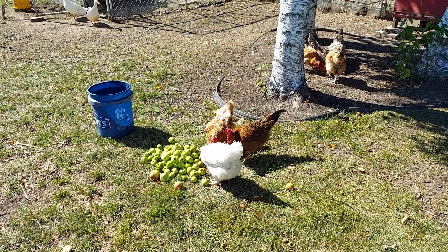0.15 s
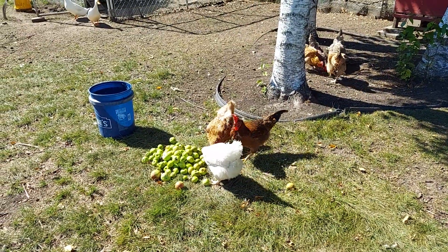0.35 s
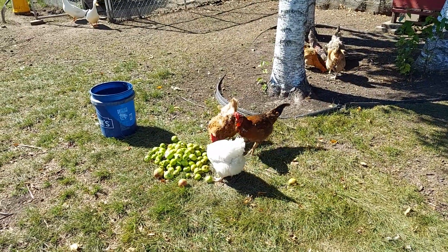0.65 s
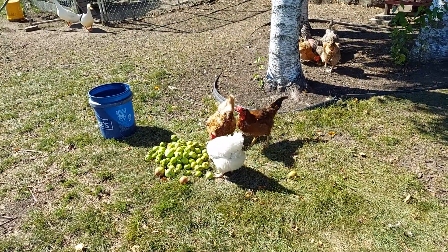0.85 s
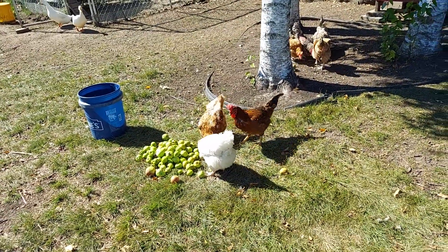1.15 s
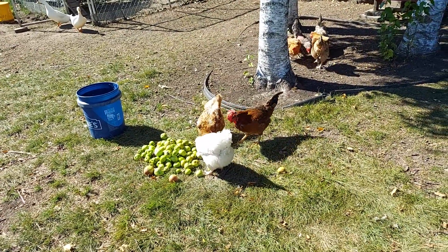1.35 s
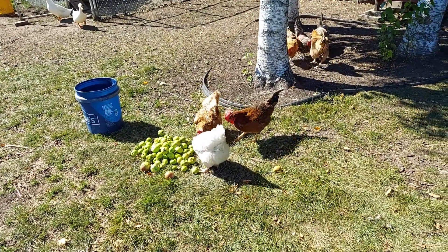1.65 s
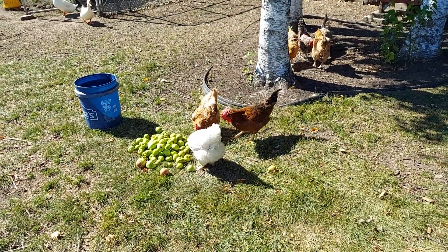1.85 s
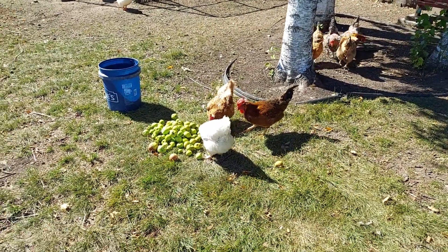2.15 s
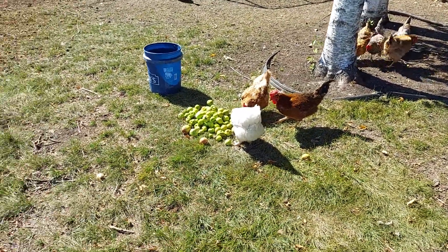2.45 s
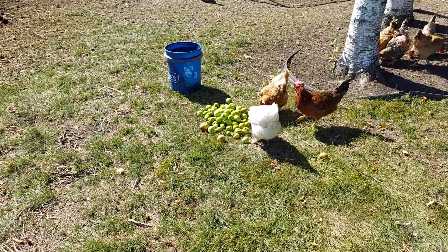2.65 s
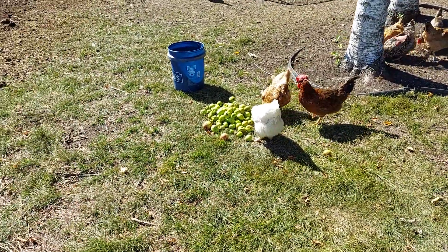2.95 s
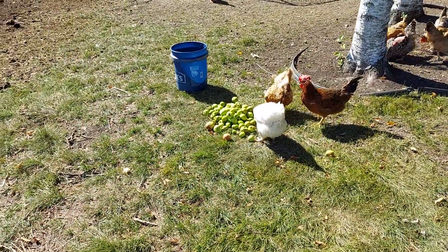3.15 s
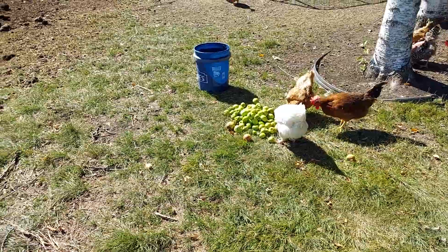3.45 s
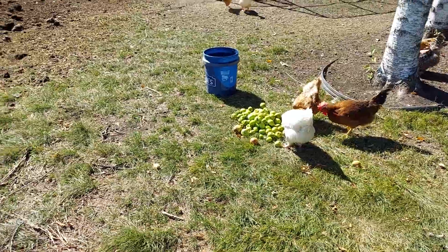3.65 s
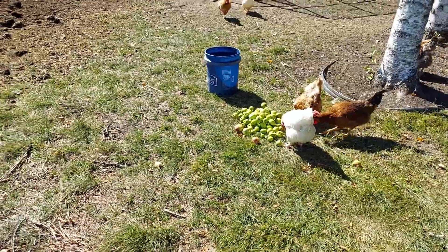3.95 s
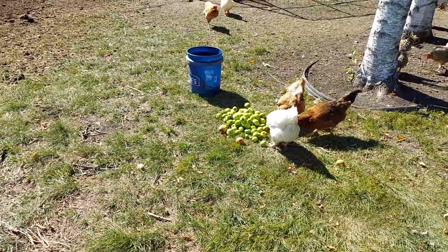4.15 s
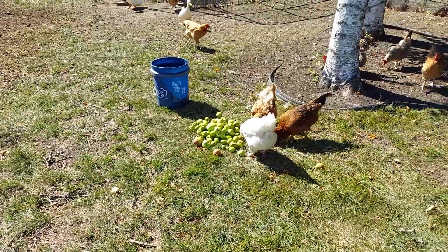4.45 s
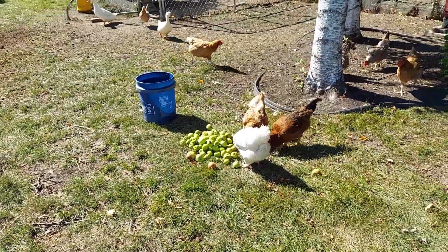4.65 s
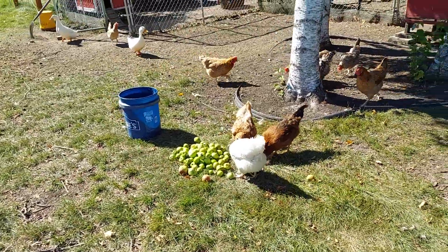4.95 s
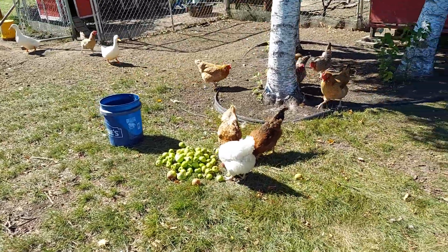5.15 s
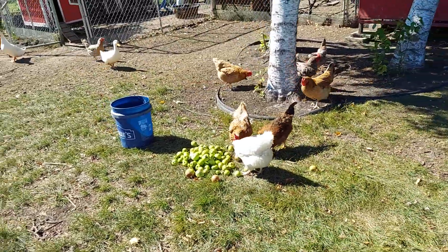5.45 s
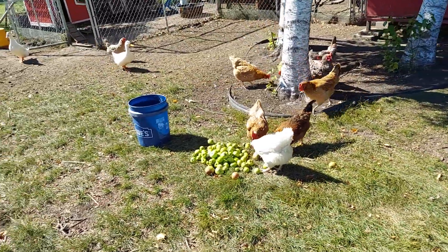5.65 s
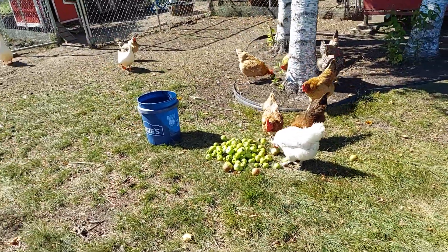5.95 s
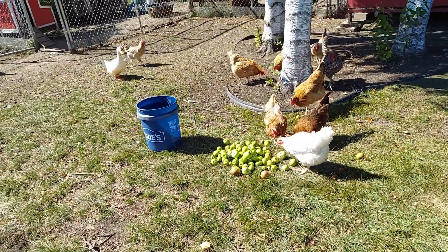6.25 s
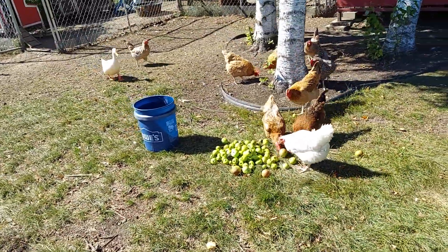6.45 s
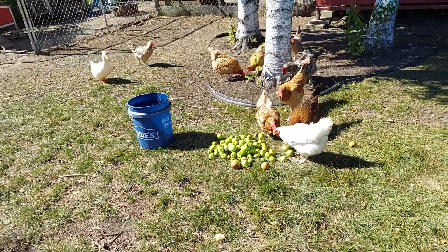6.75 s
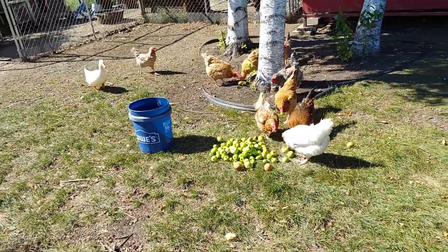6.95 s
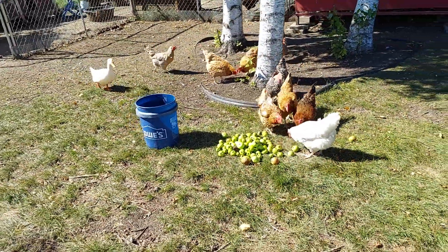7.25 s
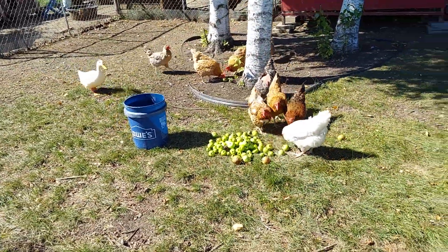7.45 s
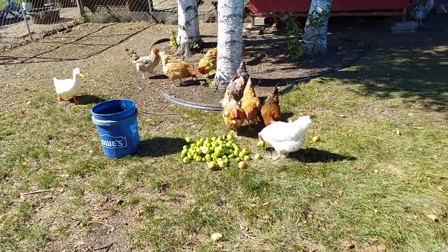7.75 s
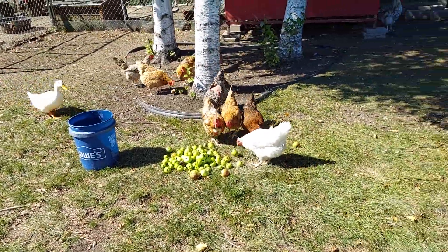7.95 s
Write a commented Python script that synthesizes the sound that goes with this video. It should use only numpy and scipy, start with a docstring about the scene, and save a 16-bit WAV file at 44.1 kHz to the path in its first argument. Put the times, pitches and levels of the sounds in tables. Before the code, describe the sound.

Footsteps crackle through dry grass and twigs while ducks quack, hens cluck softly and a wire fence clangs in a backyard.

```python
"""A sunny backyard. A rooster ends its crow as a far engine drones and drops away; hens cluck now
and then and a small bird chips in pairs. From about two seconds a wire fence clangs and rattles,
and someone steps through dry grass, blades crackling and twigs snapping. Ducks join in and waddle
closer, their dry quacks made of quick puffs ringing in throat and bill.
Insects shrill throughout, over a low rumble and far road noise."""
import sys
import numpy as np
from scipy import signal
from scipy.fft import rfft, irfft, next_fast_len
from scipy.io import wavfile
from scipy.ndimage import uniform_filter1d, map_coordinates

SR = 44100
rng = np.random.default_rng(int(sys.argv[2]) if len(sys.argv) > 2 else 0)


def dump_mix(stems):
    """Bounce the given channels to the path in sys.argv[1] as a 16-bit WAV at rate SR."""
    frames = np.atleast_2d(stems).T  # one column per channel
    limited = np.clip(frames, -1, 1)  # hard clip at full scale
    pcm = np.round(limited * 32767).astype(np.int16)
    wavfile.write(sys.argv[1], SR, pcm)


N = 357430
TIME = np.arange(N) / SR


def amp(db):
    """Decibels to gain."""
    return 10 ** (np.asarray(db) / 20)


def unit(x):
    """Scale to rms 1."""
    return x / np.sqrt(np.mean(x ** 2) + 1e-20)


def along(points, hz):
    """Read a curve of (Hz, value) points on a log frequency axis."""
    f, v = np.transpose(points)
    return np.interp(np.log(hz + 1), np.log(f), v)


def curves(rows, t=TIME):
    """Automation: one curve for each column after the time."""
    s, *cols = np.transpose(rows)
    return [np.interp(t, s, c) for c in cols]


def wobble(rate, size=N):
    """A smooth random curve, rate knots a second."""
    knots = rng.standard_normal(int(size * rate / SR) + 4)
    return map_coordinates(knots, [np.arange(size) * rate / SR])


def phase_of(hz):
    """Running phase of a gliding pitch."""
    return 2 * np.pi * np.cumsum(hz) / SR


def filtered(x, response):
    """Shape x with a complex frequency response."""
    n = x.shape[-1]
    m = next_fast_len(n + 4096)
    return irfft(rfft(x, m) * response(np.fft.rfftfreq(m, 1 / SR)), m)[..., :n]


def through(x, spectrum, size=2048):
    """Let x ring a body with this spectrum (minimum phase, energy 1)."""
    cepstrum = irfft(np.log(amp(along(spectrum, np.fft.rfftfreq(size, 1 / SR)))))
    cepstrum[1:size // 2] *= 2
    cepstrum[size // 2 + 1:] = 0
    ring = irfft(np.exp(rfft(cepstrum)))
    ring /= np.linalg.norm(ring)
    return signal.oaconvolve(np.atleast_2d(x), ring[None], axes=1)[:, :x.shape[-1]]


def noise(spectrum, alike, size=N):
    """Coloured stereo noise of rms 1; alike is the share common to both ears."""
    white = rng.standard_normal((3, size))
    stereo = np.sqrt(alike) * white[2] + np.sqrt(1 - alike) * white[:2]
    return unit(filtered(stereo, lambda hz: amp(along(spectrum, hz))))


def place(x, pan_db, lag_ms):
    """Pan a source: the left ear is pan_db louder and lag_ms later."""
    side = np.array([[.5], [-.5]])
    return amp(side * pan_db) * filtered(x, lambda hz: np.exp(-2j * np.pi * hz * side * lag_ms / 1000))


def add(track, s, x):
    """Mix x into the track at s seconds."""
    part = track[..., max(round(s * SR), 0):][..., :x.shape[-1]]
    part += x[..., :part.shape[-1]]


# The nasal colour of a duck's throat and bill. Each row: frequency in Hz, gain in dB.
THROAT_EQ = [(200, -47), (700, -17), (1080, -12.5), (1330, 10.5), (1700, 1), (2150, 3.5), (2420, -12.5),
             (2650, -4), (3080, -18.5), (3450, -6.5), (4050, -7), (4800, -5), (6200, -15.5), (7500, -28),
             (12000, -48)]


def quack(swell, fade, level_db, peak_hz, rattle_hz=72, puff_s=.0084, depth_db=19, cutoff_db=24):
    """The syrinx opens in chirping puffs; with effort they quicken, rise and steady into a clearer buzz."""
    t = np.arange(int((swell + fade) * SR)) / SR
    slack = np.interp(t, [0, swell, swell + fade], [1, 0, 1])
    hz = peak_hz * (1 - .2 * slack ** 1.5 * np.sqrt(swell / .34))
    strain = np.clip((hz - 1620) / 280, 0, 1)
    jitter = (.12 - .095 * strain) * wobble(70, len(t))  # strain steadies the rattle
    puff_rate = rattle_hz * (hz / 1550) ** 1.3 * (1 + jitter)
    cycles = np.cumsum(puff_rate) / SR
    progress = cycles % 1
    age = progress / puff_rate
    sizes = amp(1.9 * rng.standard_normal(int(cycles[-1]) + 1))[cycles.astype(int)]
    opening = (1 - np.exp(-age / .0012)) ** 2 * (1 - progress ** 12)
    puffs = sizes * opening * (np.exp(-age / puff_s) + .16 * strain)
    chirp_cycles = hz * age * (1 + .44 * (progress / 2 - .32))
    phase = 2 * np.pi * chirp_cycles + (1 - .5 * strain) * wobble(500, len(t))
    tone = np.sqrt(2) * (np.sin(phase) + amp(-11) * strain * np.sin(2 * phase))
    breath = (1.1 - .35 * strain) * rng.standard_normal(len(t))
    scattered = .5 * rng.standard_normal((2, len(t)))
    voice = through(puffs * (tone + breath + scattered), THROAT_EQ)
    # even out the voice, then let it build and cut off
    power = uniform_filter1d(np.mean(voice ** 2, axis=0), size=1800)
    voice /= np.sqrt(np.abs(power) + 1e-12)
    drop_db = np.where(t < swell, depth_db * slack ** 2.8, cutoff_db * slack ** 1.4)
    edges = np.clip(np.minimum(t, t[-1] - t) / .018, 0, 1)
    return voice * amp(level_db - drop_db) * edges


# Quacks. Each row: start, swell and fade in seconds, level in dB, pitch at the loudest in Hz.
QUACK_CUES = [(2.455, .03, 0.062, -50.5, 1610), (2.691, 0.048, 0.044, -45.5, 1678),
              (2.865, 0.048, 0.057, -48.5, 1580), (3.125, 0.068, 0.043, -48, 1712),
              (3.329, 0.048, 0.068, -50.5, 1588), (3.58, 0.055, 0.044, -46.5, 1820),
              (3.92, 0.048, 0.084, -46, 1755), (4.029, 0.21, 0.083, -45, 1605),
              (4.475, 0.051, 0.067, -45, 1560), (4.695, 0.06, 0.055, -40, 1675),
              (5.115, 0.044, 0.045, -43.5, 1642), (5.24, .3, 0.082, -37.5, 1908),
              (5.624, 0.067, 0.044, -41, 1639), (6.13, 0.032, 0.068, -40, 1690),
              (6.245, 0.064, 0.069, -45.5, 1620), (6.365, .305, .06, -36.5, 1960),
              (6.899, 0.044, 0.044, -41, 1702), (7.436, 0.046, 0.051, -44.5, 1502),
              (7.535, 0.075, 0.11, -43.5, 1468), (7.61, .3, 0.057, -35.5, 1881)]
# The ducks' path. Each row: time in seconds, left minus right in dB, lead at the left ear in ms.
DUCK_PAN = [(3.2, -2, -0.055), (5, -8.5, 0.3), (6.5, -8.5, 0.34)]


def ducks(bounce=.28, bounce_s=.0018):
    """The ducks waddle nearer on the right; the ground returns each quack a moment later."""
    out = np.zeros((2, N))
    for s, swell, fade, db, hz in QUACK_CUES:
        pan_db, lead_ms = curves(DUCK_PAN, s)
        add(out, s, place(quack(swell, fade, db, hz), pan_db, -lead_ms))
    return filtered(out, lambda hz: 1 + bounce * np.exp(-2j * np.pi * hz * bounce_s))


# Steps in the grass. Each row: start and length in seconds, level in dB, extra sizzle in dB.
STEP_CUES = [(1.978, 0.38, -55.5, 1.5), (2.326, 0.25, -51, -5), (2.6, .1, -61, 0), (3.22, .13, -54.5, -3),
             (3.67, 0.11, -53.5, -3), (3.935, 0.16, -46, -2), (4.074, 0.16, -42.5, 5.5),
             (4.234, 0.25, -45.5, 7), (4.56, 0.099, -47, -1), (4.822, 0.25, -49.5, -1.5),
             (4.98, 0.092, -39, -6), (5.028, .07, -38.5, 2.5), (5.204, 0.35, -47.5, 0),
             (5.37, 0.091, -39.5, 0), (5.765, 0.11, -37.5, -9), (5.849, 0.096, -37, -1),
             (5.987, 0.2, -46, 3), (6.755, 0.041, -38, -3), (6.85, 0.098, -44.5, -0.5),
             (7.525, 0.045, -48, 3.5), (7.653, .09, -50, 2), (7.848, 0.058, -40, 5),
             (7.952, 0.15, -40.5, -0.5)]
# The colour of dry blades. Each row: frequency in Hz, gain in dB.
GRASS_EQ = [(120, -22.5), (250, -6.5), (500, -4), (1100, -3.5), (1900, -0.5), (3500, -6.5), (5100, -3),
            (6300, -6.5), (8400, -2), (10500, 1.5), (13000, 2), (15700, 1), (16500, -24.5)]


def grass(grains_per_s=900, spread_db=4, sizzle_hz=9500, clump_db=1.5):
    """Dry blades crackle over a soft swish; a brushing foot sizzles more than a pressing one."""
    starts, lengths, db, sizzle_db = np.transpose(STEP_CUES)
    hits = rng.random(N) < grains_per_s / SR
    grains = hits * amp(spread_db * np.minimum(rng.exponential(size=N), 2))
    crackle = unit(grains * rng.uniform(-1.02, 1, (2, N)))
    swish = rng.standard_normal((2, N))
    rustle = unit(through(crackle + swish, GRASS_EQ))
    crunch = filtered(rustle, lambda hz: 1 / (1 + (hz / sizzle_hz) ** 8))
    sizzle = rustle - crunch
    stirred = crunch * tread(starts, lengths, db) + sizzle * tread(starts, lengths, db + sizzle_db)
    return stirred * amp(clump_db * wobble(80)) * amp([[1.2], [-1.2]])


def tread(starts, lengths, levels, attack_s=.066, release_t60=.41, settle_db=-17, settle_t60=2):
    """The steps' envelope: each foot presses, holds and lifts, and bent blades spring back."""
    power = np.zeros(N)
    for s, length, db in zip(starts, lengths, levels):
        t = np.arange(int((length + 1) * SR)) / SR
        lifted = np.maximum(t - length, 0)
        press = np.sin(np.pi / 2 * np.minimum(t / attack_s, 1)) ** 2
        release_db = np.maximum(-60 * lifted / release_t60, settle_db - 60 * lifted / settle_t60)
        add(power, s, (amp(db + release_db) * press) ** 2)
    return np.sqrt(power)


# Stalks and twigs snapping. Each row: start in seconds, level in dB, knock relative to it in dB.
SNAP_CUES = [(0.774, -37, -27), (2.2317, -19, -15.5), (2.731, -36, -22), (3.541, -29, -20),
             (4.089, -20.5, -15), (5.2957, -26.5, -15), (5.472, -39, -1), (5.723, -26.5, -15),
             (5.8685, -7, -17), (5.8802, -24.5, -2), (5.9097, -15.5, -19), (5.934, -5, -12),
             (5.989, -35, 5.5), (6.0808, -21, -14), (6.692, -36.5, 4), (6.8027, -20, -26),
             (6.813, -26, -10.5), (6.8875, -19.5, -26), (6.975, -24, -6), (7.385, -34, -21),
             (7.5862, -24, -33), (7.6799, -12.5, -22.5), (7.875, -11, -27), (7.894, -22, -29),
             (8.0484, -25.5, -3.5)]
# The bright crack and the woody knock. Each row: frequency in Hz, gain in dB.
CRACK_EQ = [(1500, -22), (3000, -11), (4200, -14), (5500, -8), (7500, 1), (10000, 0), (13000, 0),
            (16000, -3)]
KNOCK_EQ = [(80, -6), (180, 3), (550, 3), (1200, -4), (2700, -3), (3800, -20), (8000, -40)]


def twigs(crack_trim_db=-1, knock_trim_db=1, break_t60=.003, splinter_t60=.029, splinter_db=-19):
    """A snap is one sharp break and a brief splintering; thick twigs add a woody knock."""
    out, t = np.zeros((2, N)), np.arange(SR // 20) / SR
    fracture = amp(-60 * t / break_t60) + amp(splinter_db - 60 * t / splinter_t60)
    for s, db, knock_db in SNAP_CUES:
        burst = rng.standard_normal((2, len(t))) * fracture
        crack = through(burst + burst[::-1] / 4, CRACK_EQ)
        crack *= amp(crack_trim_db) / np.abs(crack).max() * amp([[1.5], [-1.5]])
        knock = through(burst.sum(0), KNOCK_EQ)
        knock *= amp(knock_db + knock_trim_db) / np.abs(knock).max()
        add(out, s, amp(db) * (crack + knock))
    return out


# Soft footfalls. Each row: start in seconds, relative level in dB.
THUD_CUES = [(4.102, -78), (5.54, -53), (5.929, -53), (6.607, -58.5), (6.83, -61), (7.378, -67),
             (7.874, -61)]


def footfalls(thud_t60=.25, attack_s=.00079, gain_db=13.5):
    """A heel lands dully on the turf."""
    out, t = np.zeros((2, N)), np.arange(SR // 4) / SR
    turf_eq = [(30, -42), (70, 7), (170, 0), (300, -7), (700, -28), (2000, -62)]
    envelope = amp(gain_db - 60 * t / thud_t60) * (1 - np.exp(-t / attack_s))
    for s, db in THUD_CUES:
        add(out, s, amp(db) * envelope * noise(turf_eq, alike=.94, size=len(t)))
    return out


# Blows on the fence. Each row: start in seconds, ring level in dB, clash level in dB.
CLANG_CUES = [(1.861, -37.5, -30.5), (2.531, -44.5, -49), (2.656, -46, -43), (3.174, -50.5, -76.5),
              (3.917, -46.5, -69), (3.975, -45.5, -41.5)]
# Singing wires. Each row: frequency in Hz, relative level in dB, seconds to fall 60 dB.
WIRE_MODES = [(1965, -8, .7), (2020, -4, .5), (2230, -8, .6), (3182, -16, .45), (3510, -15, 1.1),
              (3967, -7, 1.1), (4164, -5, .8), (4264, -4, .7), (4350, -2, .4), (4444, -3, .9),
              (4829, -4, .4), (5728, -13, .3), (7965, -11, .7)]
# The rattling mesh and the clashing links. Each row: frequency in Hz, gain in dB.
MESH_EQ = [(300, -5), (1000, 1), (1600, 3.5), (2050, 12.5), (2400, 9), (2800, -1.5), (3600, 3.5), (4280, 5),
           (5000, -1), (6600, -6), (8200, -3), (10000, -15.5), (16000, -4.5)]
CLASH_EQ = [(300, -2), (600, 7.5), (1500, -44), (2100, 10), (2900, -10), (4500, 12), (7000, 10.5),
            (9000, 9.5), (13000, 7), (16000, -4)]


def fence(mesh_t60=.98, clash_t60=.32, wire_db=-9, tail_db=-19, tail_t60=2, attack_s=.00093):
    """Each blow makes the links clash, then the mesh rattles out while single wires sing."""
    out, t = np.zeros((2, N)), np.arange(2 * SR) / SR
    attack = 1 - np.exp(-t / attack_s)
    mesh_decay = amp(-60 * t / mesh_t60) + amp(tail_db - 60 * t / tail_t60)
    for s, db, clash_db in CLANG_CUES:
        wires = np.zeros((2, len(t)))
        for hz, level, t60 in WIRE_MODES:
            shimmer = amp(wire_db + level - 60 * t / t60 + 4.4 * wobble(29, len(t)))
            wires += shimmer * np.sin(2 * np.pi * (hz * t + rng.random((2, 1))))
        mesh = noise(MESH_EQ, alike=.26, size=len(t)) * mesh_decay
        clash = noise(CLASH_EQ, alike=.098, size=len(t))
        clash *= amp(clash_db - 60 * t / clash_t60 + 1.05 * wobble(293, len(t)))
        add(out, s, (amp(db) * (mesh + wires) + clash) * attack)
    return out


# The falling end of the crow. Each row: time in seconds, pitch in Hz, relative level in dB.
CROW_CONTOUR = [(0, 680, -40), (.04, 666.3, -34), (.09, 655.6, -36), (.13, 626.5, -44), (.165, 619, -40.5),
                (.19, 540, -43.5), (.22, 520, -51), (.26, 493, -79)]
# The rooster's timbre. Each row: harmonic number, gain in dB.
CROW_HARMONICS = [(1, -4), (2, -2), (3, -30), (4, -21), (5, -42), (6, -38)]


def rooster(gain_db=4):
    """A clean, far crow that sags and breaks up into hoarse noise as it ends."""
    hz, db = curves(CROW_CONTOUR)
    hoarse = np.interp(TIME, [.14, .21], [.004, .03])
    phase = phase_of(hz * (1 + hoarse * wobble(298)))
    voice = sum(amp(level) * np.sin(k * phase) for k, level in CROW_HARMONICS)
    rasp_eq = [(250, -17), (450, -3), (700, -7), (1300, -1), (2300, -15), (3000, -13), (4500, -27)]
    rasp = noise(rasp_eq, alike=.43) * hoarse * 14
    envelope = amp(db + gain_db) * (TIME < CROW_CONTOUR[-1][0])
    return place(envelope * (voice + rasp), pan_db=-1, lag_ms=.22)


# Clucks. Each row: start and length in seconds, pitch in Hz, level in dB, roughness from 0 to 1.
CLUCK_CUES = [(0.159, 0.06, 424, -42.5, 0.9), (0.301, 0.2, 1014, -52.5, 0.07),
              (0.387, 0.073, 401.4, -47.5, 0.51), (0.566, 0.073, 717, -55, 0.86),
              (0.759, 0.075, 380, -58, 0.84), (3.036, 0.033, 352, -51, 0.56),
              (4.728, 0.045, 524, -41.5, 0.58), (6.581, 0.047, 451, -52.5, 0.8),
              (7.106, .13, 2165, -60.5, 0.13), (7.815, 0.025, 644, -44.5, 0.3),
              (8.019, 0.098, 541, -52.5, 0.7)]


def hens(sag=.0374):
    """Short, soft clucks with a rough, slightly falling pitch; the low ones carry an octave."""
    out = np.zeros(N)
    for s, length, hz, db, rough in CLUCK_CUES:
        n = int(length * SR)
        progress = np.arange(n) / n
        phase = phase_of(hz * (1 - sag * progress + .33 * rough * wobble(517, n)))
        voice = np.sin(phase) + .44 * np.sin(2 * phase) * (hz < 900)
        add(out, s, amp(db) * np.sqrt(np.sin(np.pi * progress)) * voice)
    return place(out, pan_db=2, lag_ms=.087)


# Pairs of chips. Each row: start in seconds, level of the second chip in dB.
CHIP_CUES = [(.055, -47.5), (.412, -49.5), (.771, -54), (1.325, -54), (1.60, -55.5), (2.026, -48),
             (2.452, -50), (3.035, -51.5), (4.356, -48), (5.001, -47), (6.364, -51), (6.78, -51.5),
             (7.15, -53), (7.485, -53)]


def bird(top_hz=5300, fall_hz=780, length_s=.0258, spacing_s=.037):
    """A small bird whistles two quick downward chips at a time."""
    out, progress = np.zeros(N), np.linspace(0, 1, int(length_s * SR))
    envelope = np.sin(np.pi * progress) ** 2
    for s, db in CHIP_CUES:
        for delay, chip_db in ((0, -2), (spacing_s, 0)):
            hz = (top_hz - fall_hz * progress ** 2) * (1 + .0037 * rng.standard_normal())
            add(out, s + delay, amp(db + chip_db) * envelope * np.sin(phase_of(hz)))
    return place(out, pan_db=4, lag_ms=0)


# The insects' fader. Each row: time in seconds, level in dB.
INSECT_FADER = [(0, -50), (1.6, -53.5), (3.3, -52.5), (4.3, -52), (8.1, -50)]
# The shrill band of the chorus. Each row: frequency in Hz, gain in dB.
CHORUS_EQ = [(6500, -81), (7400, -24), (7900, -6.5), (8400, 0.5), (8900, -3), (9200, -13), (9700, -32),
             (11000, -74)]


def insects(stroke_hz=18, song_hz=9050, song_db=-1):
    """A blurred chorus, with one nearer cricket whose wing strokes each arch in pitch."""
    db, = curves(INSECT_FADER)
    chorus = noise(CHORUS_EQ, alike=.17) * amp(1.27 * wobble(110))
    stroke = np.cumsum(stroke_hz * (1 + .03 * wobble(1.1))) / SR % 1 - .5
    hz = song_hz - 2600 * stroke ** 2 + 60 * wobble(440)
    swell = np.exp(-(stroke / .17) ** 2) * amp(song_db + 1.5 * wobble(3))
    song = swell * np.sin(phase_of(hz))
    # the chorus falls into step with the strokes
    chorus *= 1 + np.interp(TIME, [2, 7], [.1, .4]) * np.cos(2 * np.pi * stroke)
    return amp(db) * place(chorus + song, pan_db=4, lag_ms=.315)


# Far whines. Each row: start and length in seconds, centre and width in Hz, level in dB.
WHINE_CUES = [(0.903, 6.2, 444, 7.8, -67), (0.997, 0.71, 931, 180, -57.5), (2.351, 0.48, 265, 8.9, -62.5),
              (2.4, 1.82, 770, 160, -58.5)]


def whines():
    """Distant motors and tyres: narrow, wavering tones that swell and pass."""
    out = np.zeros(N)
    for s, length, centre_hz, width_hz, db in WHINE_CUES:
        n = int(length * SR)
        white = rng.standard_normal(n)
        tone = unit(filtered(white, lambda hz: 1 / (1 + ((hz - centre_hz) / width_hz * 2) ** 2)))
        add(out, s, amp(db) * tone * np.sin(np.pi * np.arange(n) / n))
    return place(out, pan_db=4.5, lag_ms=.11)


# The engine's fader. Each row: time in seconds, level in dB.
ENGINE_FADER = [(.15, -45), (.6, -49), (1.35, -42.5), (1.95, -51), (2.25, -62)]


def engine(firing_hz=86.8):
    """A far engine drones at its firing rate, swells and drops away."""
    db, = curves(ENGINE_FADER)
    hz = firing_hz * (1 + .0094 * wobble(4.43))
    drone = np.sqrt(2) * np.sin(phase_of(hz)) * amp(db + wobble(10.7))
    return place(drone, pan_db=0, lag_ms=.35)


# The rumble's colour. Each row: frequency in Hz, gain in dB.
RUMBLE_EQ = [(20, -28), (32, -30), (45, -7.5), (60, 11), (80, -1), (120, 3.5), (180, -10), (300, -24.5),
             (600, -37.5)]
# Its fader. Each row: time in seconds, relative level in dB.
RUMBLE_FADER = [(0, -53), (1.5, -54.5), (2.2, -58), (2.9, -57), (3.55, -62.5), (4.2, -54.5), (5.95, -52),
                (7.2, -57.5), (8.1, -55.5)]


def rumble(gain_db=1):
    """A low bed of noise that slowly rises and falls."""
    db, = curves(RUMBLE_FADER)
    return noise(RUMBLE_EQ, alike=.93) * amp(db + gain_db)


# The road's colour. Each row: frequency in Hz, gain in dB.
ROAD_EQ = [(100, -3.5), (260, 0), (350, -5.5), (450, 1), (560, -5), (800, 4), (1050, -1.5), (1400, -4),
           (2200, -25), (4000, -33)]
# Its fader. Each row: time in seconds, relative level in dB.
ROAD_FADER = [(0, -59.5), (2.7, -58.5), (3.7, -62.5), (4.6, -57), (6.3, -62), (8.1, -60.5)]


def traffic(gain_db=3):
    """Far traffic blurs into a dull, wavering wash."""
    db, = curves(ROAD_FADER)
    wash = noise(ROAD_EQ, alike=.88) * amp(db + gain_db + 2 * wobble(6.6))
    return place(wash, pan_db=-2, lag_ms=.17)


# The colour of the open air. Each row: frequency in Hz, gain in dB.
AIR_EQ = [(300, -9), (2000, 15.5), (3100, -16), (4000, 8.5), (5000, 15), (6500, 8.5), (10000, 10.5),
          (13000, 11.5), (16000, 4.5)]


def air(level_db=-61):
    """A faint, wide, steady hiss."""
    return place(noise(AIR_EQ, alike=.1) * amp(level_db), pan_db=0, lag_ms=.35)


# The yard's decay. Each row: frequency in Hz, seconds to fall 60 dB.
YARD_DECAY = [(200, 0.64), (2000, 0.2), (10000, 0.39)]


def yard_echo(x):
    """Sheds and trees send back a thin, short tail."""
    hz, t, bands = signal.stft(rng.standard_normal((2, SR // 2)), SR, nperseg=256)
    decay = amp(-60 * t / along(YARD_DECAY, hz)[:, None])
    _, tail = signal.istft(bands * decay, SR, nperseg=256)
    tail = np.pad(tail, ((0, 0), (SR // 100, 0)))  # 10 ms pre-delay
    return signal.fftconvolve(x, tail / np.linalg.norm(tail[0]), axes=1)[:, :N]


def scene():
    """The mix: far birds are wetter than the ducks; the steps are close and dry."""
    near, far = ducks(), rooster() + hens() + bird()
    echo = yard_echo(amp(-12) * near + amp(-3.5) * far)
    foley = fence() + grass() + twigs() + footfalls()
    ambience = insects() + whines() + engine() + rumble() + traffic() + air()
    return near + far + echo + foley + ambience


def record(dry):
    """A steep low-pass takes off the very top of the treble."""
    top_hz = 15950
    return filtered(dry, lambda hz: 1 / (1 + (hz / top_hz) ** 160))


dry = scene()
out = record(dry)
dump_mix(out)
```